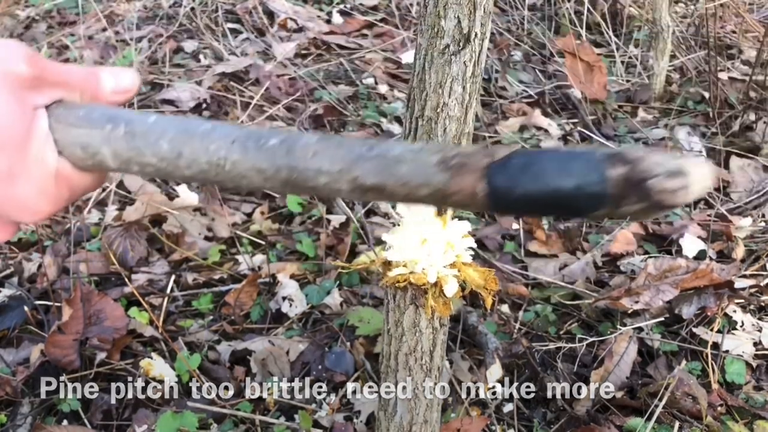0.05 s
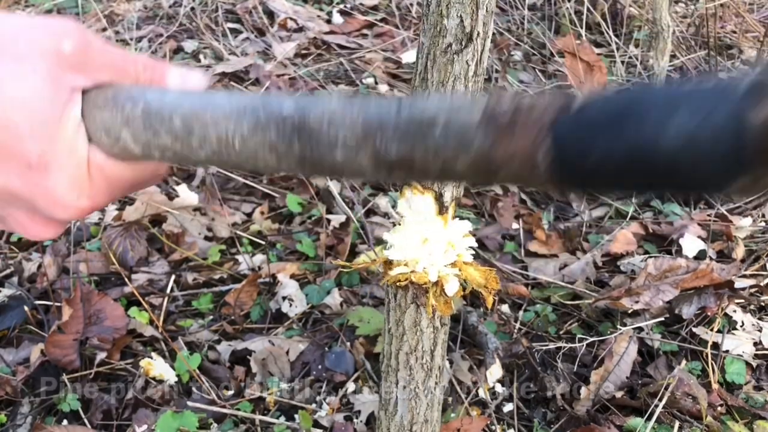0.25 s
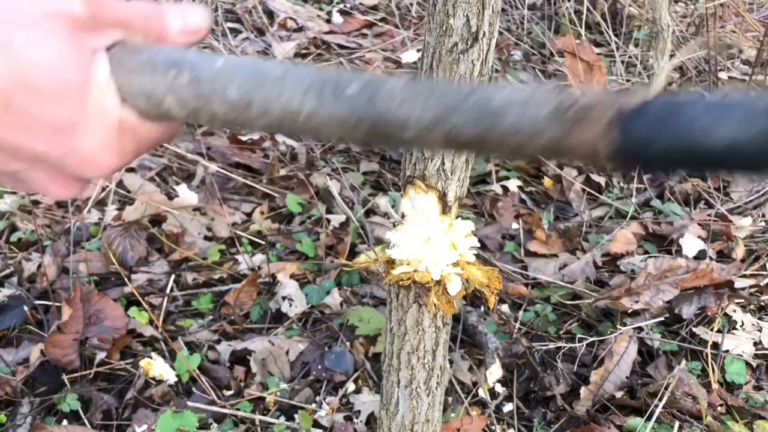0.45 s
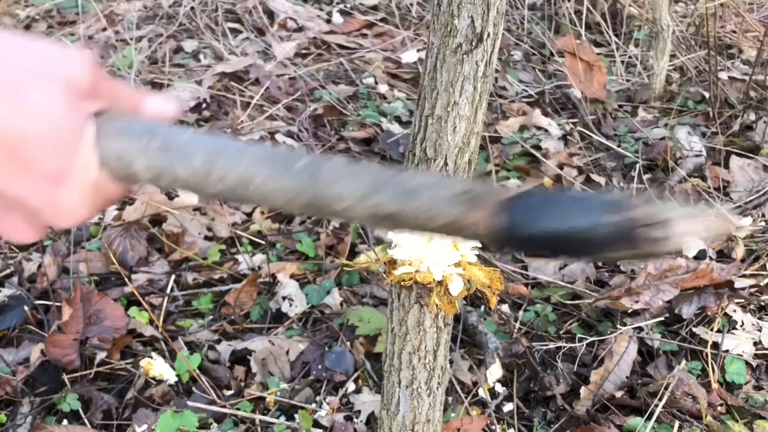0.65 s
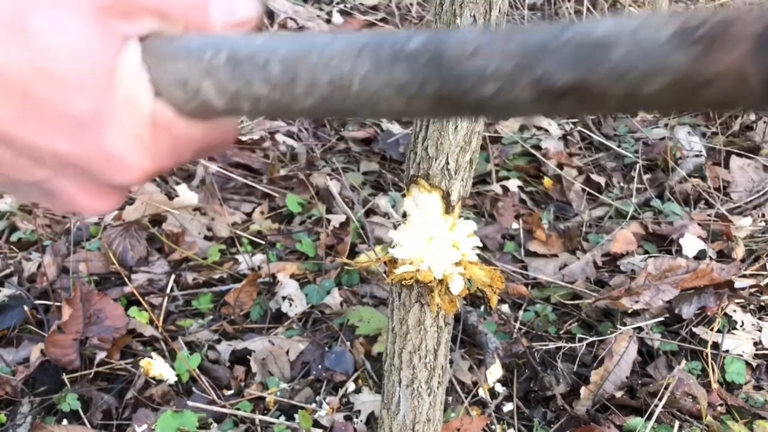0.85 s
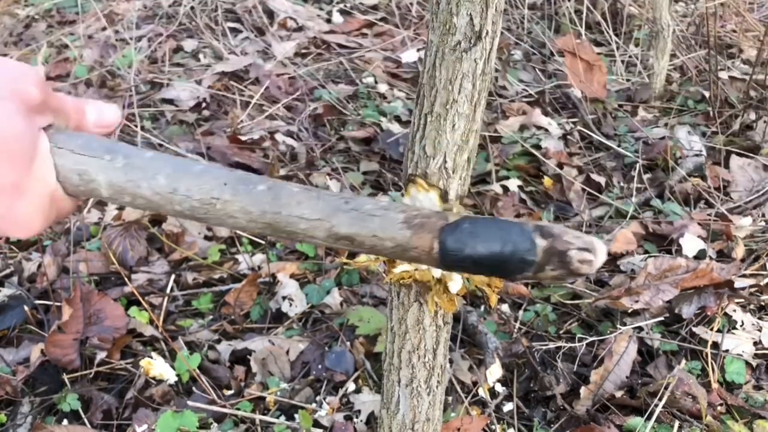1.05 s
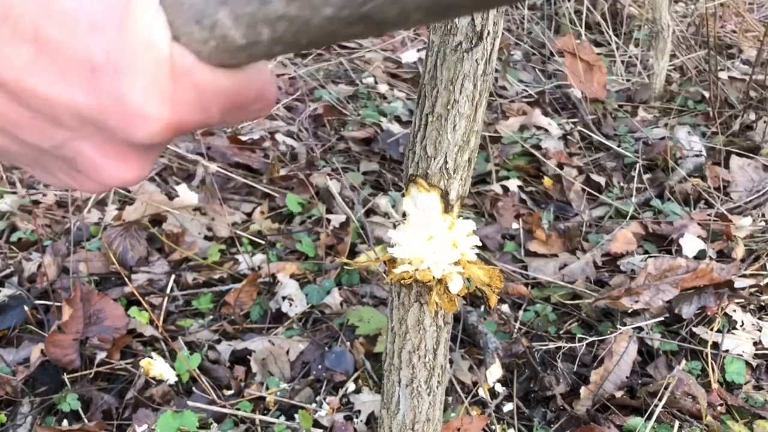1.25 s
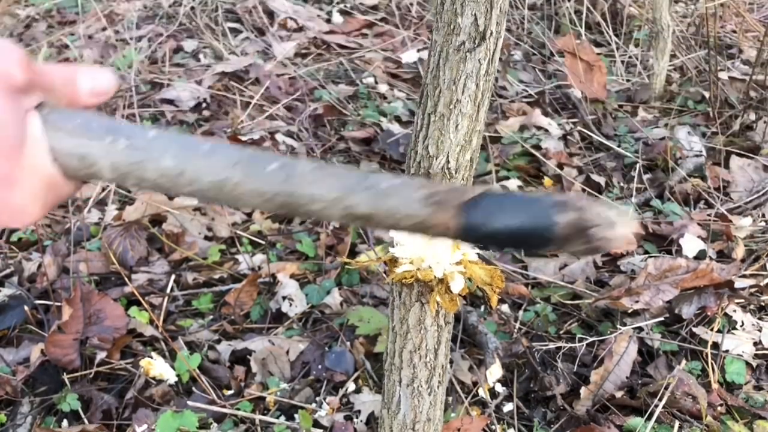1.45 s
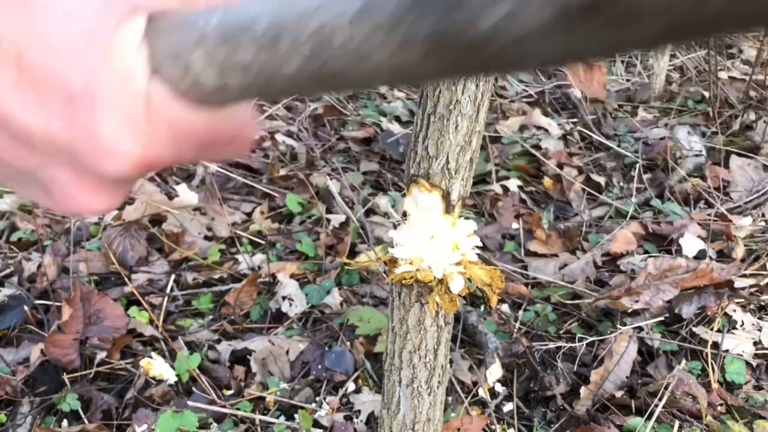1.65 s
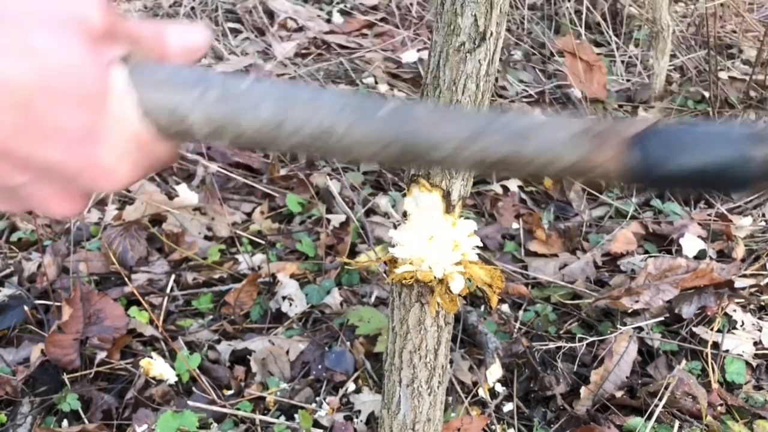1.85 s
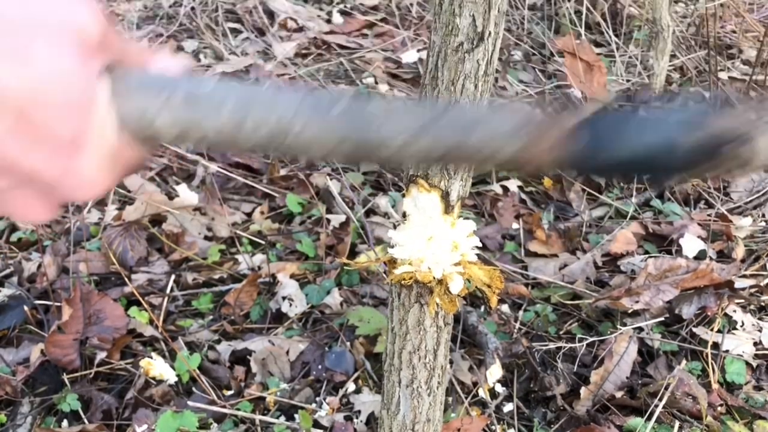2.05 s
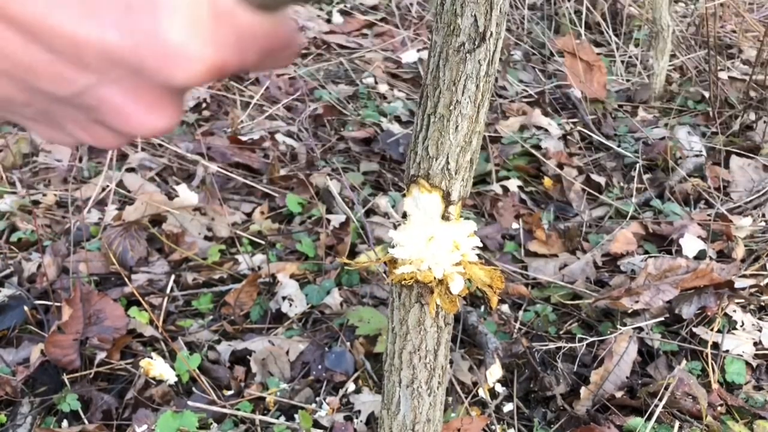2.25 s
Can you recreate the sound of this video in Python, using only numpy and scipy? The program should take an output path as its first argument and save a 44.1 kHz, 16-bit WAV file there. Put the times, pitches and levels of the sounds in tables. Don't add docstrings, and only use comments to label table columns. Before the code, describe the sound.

A stone axe chops a thin trunk, close in mono, at about 0.2, 0.6, 0.9, 1.3, 1.6 and 2.0 seconds. The first knock thuds deepest, the second is brightest, the fifth bright with little thud. Fibres crack; brittle chip snaps follow the last four blows. Bits patter on dry leaves, with a short woodland tail, faint rustle, far rumble and a tiny chirp near 1.8 seconds.

```python
import sys
import numpy as np
from scipy import signal
from scipy.io import wavfile
from scipy.ndimage import uniform_filter1d

SR = 44100
rng = np.random.default_rng(int(sys.argv[2]) if len(sys.argv) > 2 else 0)


def transcribe(u):
    v = np.clip(np.atleast_2d(u).T, -1, 1)
    q = np.round(v * 32767).astype(np.int16)
    wavfile.write(sys.argv[1], SR, q)


def natural_amplitude(level_db):
    exponent = np.asarray(level_db, float) / 20
    return 10 ** exponent


N = 101430

# [t/s, knock level/dB, knock f/Hz, thud level/dB, crack level/dB]
BLOWS = [
    (0.2154, -7, 1390, -9.5, -8.5),
    (0.5799, -1.5, 2490, -18, -10),
    (0.9203, -8, 1630, -19, -9.5),
    (1.2724, -6.5, 1580, -21.5, -11),
    (1.6373, -3, 2180, -34, -14),
    (1.9823, -6.5, 1835, -13, -8),
]
# [upper trunk mode level/dB, late tail level/dB]
SHADES = [(2, -1.5), (-3, 3), (-19, 2.5), (-1.5, -0.5), (7, 4.5), (-0.5, -1.5)]
BLOW_S = np.array(BLOWS)[:, 0]


def rms_one(x):
    return x / np.sqrt(np.mean(x ** 2) + 1e-20)


def at_hz(points, hz):
    points_hz, values = np.array(points).T
    return np.interp(np.log(hz), np.log(points_hz), values)


def clicks(s, gain):
    out = np.full(N, 1e-18)
    np.add.at(out, (np.asarray(s) * SR).astype(int), gain)
    return out


def ring(x, hz, t60):
    r = natural_amplitude(-60 / (t60 * SR))
    w = 2 * np.pi * min(hz, 0.45 * SR) / SR
    return signal.lfilter([0, np.sin(w)], [1, -2 * r * np.cos(w), r * r], x)


def fade(x, t60):
    return signal.lfilter([1], [1, -natural_amplitude(-60 / (t60 * SR))], x)


def band(x, low_hz, high_hz):
    sos = signal.butter(2, [low_hz, min(high_hz, 0.45 * SR)], "band", fs=SR, output="sos")
    return signal.sosfilt(sos, x)


def add(out, s, x):
    i = int(s * SR)
    out[i:i + len(x)] += x[:N - i]


def bands():
    white = rng.standard_normal((2, N + 8000))
    edges = 25 * 2 ** np.arange(0, 9.6, 1 / 3)
    out = []
    for k, (low, high) in enumerate(zip(edges, edges[1:])):
        noise = rms_one(band(white[k % 2], low, high)[-N:])
        out.append((np.sqrt(low * high), high - low, noise))
    return out


def far_air():
    # [f/Hz, density/dB]
    spectrum = [(18, -28.5), (30, -3.5), (64, 4.5), (138, -2), (666, -15.5), (1350, -19), (3220, -30),
                (8980, -41.5), (16000, -43.5)]
    air = sum(n * natural_amplitude(at_hz(spectrum, hz)) * np.sqrt(width) for hz, width, n in bands())
    return natural_amplitude(-55.5) * rms_one(air)


def bird():
    start_s, length_s, low_hz, rise_hz = 1.765, 0.04, 7000, 800
    u = np.clip((np.arange(N) / SR - start_s) / length_s, 0, 1)
    phase = 2 * np.pi * np.cumsum(low_hz + rise_hz * u) / SR
    return natural_amplitude(-73) * np.sin(np.pi * u) * np.sin(phase)


def rustle():
    # [t/s, level/dB]
    course = [(0.0, -57), (0.3, -64.5), (0.5, -55.5), (0.749, -68), (1.18, -63.5), (1.6, -67.5),
              (1.85, -68.5), (2.3, -71.5)]
    grains_per_s = 550
    level = natural_amplitude(np.interp(np.arange(N) / SR, *np.transpose(course)))
    sizes = natural_amplitude(2.5 * np.minimum(rng.exponential(1, N), 3)) * (rng.random(N) < grains_per_s / SR)
    dealt = rng.integers(0, 5, N)
    noise = rng.standard_normal(N)
    grains = 0
    for k, hz in enumerate([2000, 3500, 5500, 7500, 9000]):
        shape = fade(sizes * (dealt == k) + 1e-18, 0.008)
        grains = grains + band(noise * shape, hz, 2 * hz)
    hiss = band(rng.standard_normal(N), 1800, 21000)
    return level * (natural_amplitude(-11.5) * rms_one(grains) + natural_amplitude(-7) * rms_one(hiss))


def tree_tail():
    # [f/Hz, level/dB]
    spectrum = [(60, -49), (130, -45), (300, -46.5), (700, -51.5), (1500, -52), (3500, -58.5), (8000, -59),
                (16000, -52.5)]
    # [f/Hz, t60/s]
    decay = [(100, 0.2), (500, 0.15), (1500, 0.4), (4000, 0.47), (16000, 0.05)]
    # [f/Hz, level/dB]
    scatter = [(100, -16), (600, 15), (3000, 19), (9000, 10), (16000, 10.5)]
    strength = [12.8, 1.8, 3, 2.5, -1.5, 6.8]
    lag_s, early_t60_s = 0.0015, 0.027
    early = fade(clicks(BLOW_S + lag_s, natural_amplitude(np.array(strength))), early_t60_s)
    late = clicks(BLOW_S + lag_s, natural_amplitude(np.array(SHADES)[:, 1]))
    flutter = natural_amplitude(1.5 * rms_one(band(rng.standard_normal(N), 16, 150)))
    tail = 0
    for hz, _, noise in bands():
        late_shape = fade(late, at_hz(decay, hz)) * (flutter if hz > 1000 else 1)
        shape = natural_amplitude(at_hz(scatter, hz)) * early + late_shape
        speed = hz / SR / 2
        tail = tail + noise * natural_amplitude(at_hz(spectrum, hz)) * signal.lfilter([speed], [1, speed - 1], shape)
    return tail


def sway():
    # [f/Hz, t60 of the resonance/s, steady level/dB, level after a blow/dB]
    hums = [(130, 0.16, -65.5, -52)]
    lag_s, t60_s = 0.074, 0.4
    after = uniform_filter1d(fade(clicks(BLOW_S + lag_s, 1), t60_s), size=1500)
    out = 0
    for hz, t60, steady_db, db in hums:
        hum = rms_one(ring(rng.standard_normal(N), hz, t60))
        out = out + hum * (natural_amplitude(steady_db) + natural_amplitude(db) * after)
    return out


def patter():
    # [t/s, peak level/dB, f/Hz, length/s]
    landings = [(1.028, -35, 2430, 0.017), (.0478, -54, 9000, 0.0078), (0.075, -49, 7000, 0.014),
                (0.131, -42.5, 9000, 0.0076), (.146, -49, 7800, 0.0046), (0.155, -34, 3700, 0.0086),
                (0.179, -40.5, 11000, 0.012), (0.3017, -35, 7500, 0.018), (0.3415, -40, 6230, 0.011),
                (0.376, -51, 7000, 0.0038), (2.296, -49.5, 1720, 0.013), (0.454, -51, 6100, 0.016),
                (0.463, -46.5, 6100, 0.059), (0.5445, -48, 7700, 0.02), (.648, -46.5, 9000, 0.0049),
                (0.865, -49, 8330, 0.0056), (1.021, -48, 5800, 0.055), (1.1226, -44.5, 4500, 0.015),
                (1.153, -52, 7000, .006), (1.174, -45, 11000, 0.0069), (1.3645, -43.5, 8300, 0.0072),
                (1.458, -52, 7000, 0.0054), (1.614, -51, 3500, 0.014), (1.7305, -33, 11000, 0.0075),
                (2.071, -42.5, 10300, 0.0059)]
    # [t/s, peak level/dB, f/Hz]
    ticks = [(.003, -45, 7000), (.032, -44, 6070), (0.086, -46, 6500), (.1405, -43.5, 11000),
             (0.195, -45, 3500), (.267, -55, 13000), (0.33, -60, 9000), (.3655, -56, 9500),
             (0.403, -46, 5000), (0.412, -40.5, 4400), (0.479, -45, 6500), (.489, -45, 9000),
             (.496, -50, 7000), (.533, -51, 8000), (0.565, -51, 13000), (.625, -42, 4000),
             (.717, -55, 9000), (.807, -54, 7000), (.898, -54, 5000), (1.198, -67, 7900),
             (1.214, -55, 5500), (1.226, -47, 5500), (1.2445, -47, 9000), (1.259, -57, 9000),
             (1.413, -57, 7000), (1.417, -65.5, 9000), (1.478, -57, 6500), (1.547, -58.5, 3000),
             (1.567, -64, 5770), (1.594, -52, 7000), (1.597, -54, 5000), (1.738, -49, 9000)]
    tick_s, spread, broad_db = 0.0046, 1 + 1 / 2.5, -3
    rows = list(landings) + [tuple(tick) + (tick_s,) for tick in ticks]
    size = (len(rows), 3000)
    noise = rng.standard_normal(size) * natural_amplitude(3 * rng.standard_normal(size))
    out, one = np.zeros(N), np.eye(1, 3000)[0]
    for (s, db, hz, length), n in zip(rows, noise):
        n = n * fade(one, 0.99 * length)
        leaf = band(n, hz / spread, hz * spread)
        add(out, s, natural_amplitude(db) * (leaf + natural_amplitude(broad_db) * band(n, 1300, 24000)))
    return out


def swing():
    whistle = [-62, -46, -51.5, -68.5, -49, -66.5]
    hz, t60_s, rise_s = 3150, 0.02, 0.025
    tone = rms_one(ring(rng.standard_normal(N), hz, t60_s))
    t = np.arange(N) / SR
    level = sum(natural_amplitude(db + 20 * np.minimum(t - s, 0) / rise_s) * (t < s) for db, s in zip(whistle, BLOW_S))
    return tone * level


def creaks():
    # [t/s, peak level/dB, f/Hz]
    shifts = [(.5565, -40.5, 1800), (1.153, -50, 1500), (1.249, -42.5, 1500), (1.262, -40, 1400),
              (1.6145, -44, 1600), (1.626, -42, 1500), (1.96, -47.5, 1700), (1.973, -46, 1400),
              (2.2965, -44.5, 1500)]
    t60_s = 0.0092
    return sum(band(ring(clicks([s], natural_amplitude(db)), hz, t60_s), hz / 2, hz * 4) for s, db, hz in shifts)


def snaps():
    # [t/s, peak level/dB, level of the duller modes/dB]
    breaks = [
        (0.9467, -6, 4),
        (1.2934, 0, -3.5),
        (1.6593, -3.5, -1.5),
        (2.0041, -1.5, -3),
    ]
    # [f/Hz, level/dB, t60/s]
    modes = [(3770, -20, 0.0085), (4310, -15.5, 0.0067), (6100, -10, 0.0017), (7500, -14, 0.0027),
             (9920, -13, 0.0043), (11650, 2, 0.0034), (14220, -4.5, .002)]
    out, one = np.zeros(N), np.eye(1, 1500)[0] + 1e-18
    noise = rng.standard_normal((4, 1500))
    echo_tail = np.roll(fade(one, 0.014), int(0.0022 * SR))
    shape = 0.25 * fade(one, 0.002) + natural_amplitude(-21) * echo_tail
    again = 0.55 * np.roll(one, int(0.00035 * SR))
    for (s, db, dull_db), n in zip(breaks, noise):
        burst = 0.6 * n * shape + one + again
        snap = sum(natural_amplitude(d + dull_db * (hz < 10000)) * ring(burst, hz, t60) for hz, d, t60 in modes)
        snap = band(snap, 2600, 20000)
        add(out, s, natural_amplitude(db) * snap / np.abs(snap).max())
    return out


def thuds():
    # [f/Hz, level/dB, t60/s]
    modes = [(62, -16.5, 0.1), (96, -14, 0.092), (130, -18.5, 0.063), (156.4, -10.5, 0.055),
             (189.6, -12, 0.029), (263, -13, 0.013), (367, 5, 0.026), (441.3, -3.5, 0.033),
             (563, -9, 0.021), (629, 0.5, 0.015), (800, -17, .02), (1008, -12.5, 0.017), (1303, -16, 0.062)]
    low_db, low_follows = -12.5, 0.1
    rebound_s, lag_cycles, lag_max_s = 0.00065, 0.49, 0.0028
    thud_db, upper_db = np.array(BLOWS)[:, 3], np.array(SHADES)[:, 0]
    chance_db = rng.normal(0, 1.5, (6, 13))
    out = 0
    for k, (hz, db, t60) in enumerate(modes):
        if hz > 230:
            level = thud_db + upper_db * (hz > 500)
        else:
            level = low_db + low_follows * (thud_db - low_db)
        lag = rebound_s + min(lag_cycles / hz, lag_max_s)
        mode = ring(clicks(BLOW_S + lag, natural_amplitude(level + db + chance_db[:, k])), hz, t60)
        out = out + band(mode, hz / 1.5, hz * 1.5)
    return out


def grain():
    # [f/Hz, width/Hz, level/dB]
    resonances = [
        [(1020, 210, -1), (1420, 120, 1.5), (1630, 52, -1), (1910, 170, -0.5), (2550, 82, -13.5),
         (3170, 66, -11), (3700, 180, -4), (5800, 160, -18)],
        [(939, 53, 3), (1470, 210, -17), (1770, 79, 2.5), (3060, 66, -2), (3900, 130, -15.5), (4580, 77, -3.5),
         (5160, 130, -27), (6130, 95, -26.5)],
        [(985, 68, 3), (1550, 240, -4), (2970, 72, -18.5), (3350, 79, -1), (4365, 88, -3), (4850, 61, -12.5),
         (5110, 110, -4.5), (5960, 140, -10.5)],
        [(982, 100, 4), (1590, 440, -1.5), (1820, 68, 1), (2970, 110, -7.5), (3420, 200, -12),
         (4610, 510, -30.5), (5820, 120, -18.5), (6710, 82, -32.5)],
        [(897, 146, -4), (1600, 88, -1.5), (2140, 43, -2.5), (3360, 76.7, -7), (3980, 260, -2), (4000, 76, 1),
         (5250, 98, -10), (5320, 110, -11.5)],
        [(1300, 61, 6), (1473, 68, -6.5), (1973, 71, -14), (2540, 73, -5), (3190, 160, -7), (4130, 170, -22),
         (5500, 144, -17.5), (6770, 160, -11.5)],
    ]
    levels = [-11, -24, -10.5, -14, -15.5, -12.5]
    widen_hz, lag_cycles = 80, 0.84
    out = 0
    for s, level_db, modes in zip(BLOW_S, levels, resonances):
        for k, (hz, width, db) in enumerate(modes):
            width = width + widen_hz
            gain = (-1) ** k * natural_amplitude(level_db + db) * width / 200
            t60 = np.log(1000) / np.pi / width
            mode = ring(clicks([s + lag_cycles / hz], gain), hz, t60)
            out = out + band(mode, hz / 1.5, hz * 1.5)
    return out


def second_bites():
    # [t/s, level/dB, f/Hz]
    bites = [(.218, -2, 9000), (.219, -2, 3800), (.5818, -36, 8000), (.5925, -31, 9000),
             (.9205, -2.5, 6000), (.9225, -21, 5500), (1.6405, -10.5, 9000), (1.6485, -27, 1300),
             (1.9855, -2.5, 9000), (1.2745, -13, 11000)]
    ring_cycles = 21
    out, one = np.zeros(N), np.eye(1, 2000)[0] + 1e-18
    for s, db, hz in bites:
        if hz > 5000:
            burst = band(rng.standard_normal(2000) * fade(one, 0.0019), hz * 0.48, hz * 1.8)
        else:
            burst = -band(ring(one, hz, ring_cycles / hz), hz / 2, hz * 2)
        add(out, s, natural_amplitude(db) * burst)
    return out


def knocks():
    # [ratio to the knock f, level/dB]
    overtones = [(1.053, -1.5), (2.4, -30.5), (1.215, 0), (1.69, -7.5), (2, -8), (2.7, -23)]
    rings = [0.012, 0.0011, 0.008, 0.006, 0.0022, 0.0038]
    touch_s, touch_share, crack_t60_s = 0.00037, 0.26, 0.004
    out, one = np.zeros(N), np.eye(1, 2000)[0] + 1e-18
    chance_db = rng.normal(0, 2, (6, 6))
    for k, (s, db, hz, _, crack_db) in enumerate(BLOWS):
        body = 0
        for (ratio, d), chance in zip(overtones, chance_db[k]):
            body = body + natural_amplitude(db + d + chance) * ring(one, hz * ratio, rings[k] / ratio)
        body = -band(body, 1000, 7000)
        add(out, s, body)
        add(out, s - touch_s, -touch_share * body)
        crack = band(rng.standard_normal(2000) * fade(one, crack_t60_s), 2000, 20000)
        add(out, s, natural_amplitude(crack_db) * crack)
    return out


def scene():
    place = far_air() + bird() + rustle() + tree_tail() + sway()
    small = patter() + swing() + creaks() + snaps()
    axe = thuds() + grain() + second_bites() + knocks()
    return (place + small + axe)[None]


def band_limit(x):
    return signal.sosfilt(signal.butter(12, 17180, fs=SR, output="sos"), x)


def record(dry):
    top_hz, low_hz = 17100, 54
    x = 1.1 * np.tanh(dry / 1.1)
    x = signal.sosfilt(signal.cheby2(10, 60, top_hz, fs=SR, output="sos"), x)
    x = signal.sosfilt(signal.butter(3, low_hz, "high", fs=SR, output="sos"), x)
    return band_limit(x)


dry = scene()
out = record(dry)
transcribe(out)
```